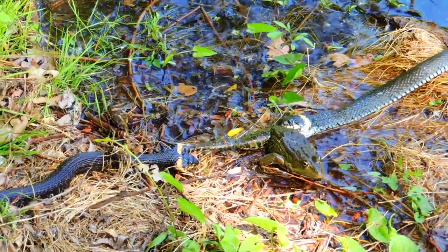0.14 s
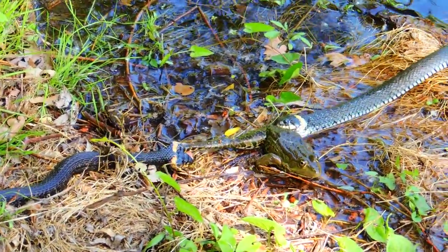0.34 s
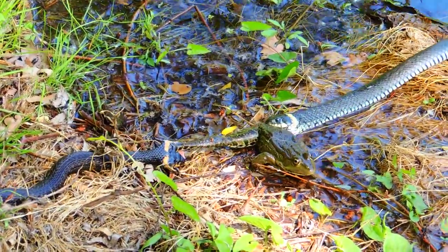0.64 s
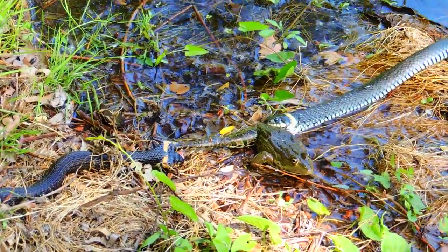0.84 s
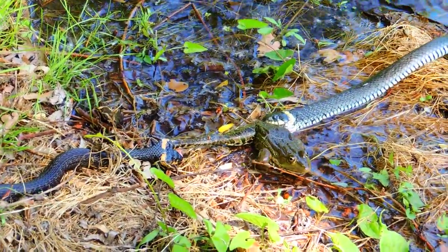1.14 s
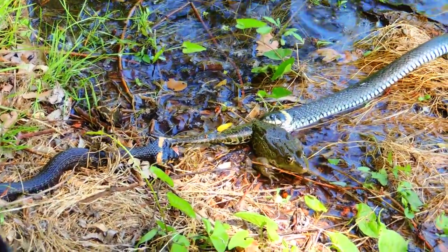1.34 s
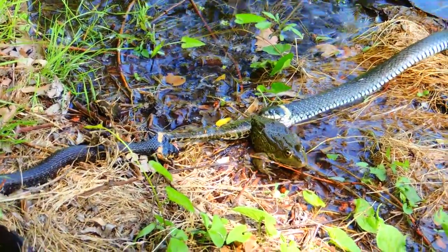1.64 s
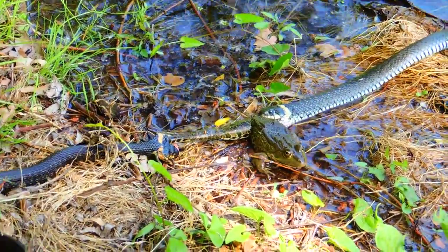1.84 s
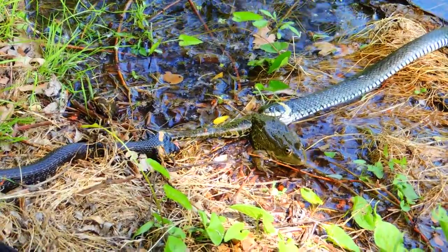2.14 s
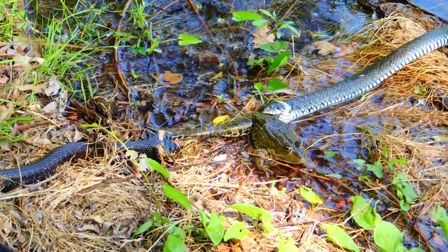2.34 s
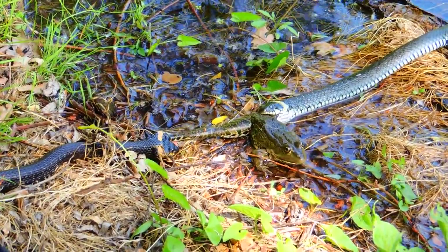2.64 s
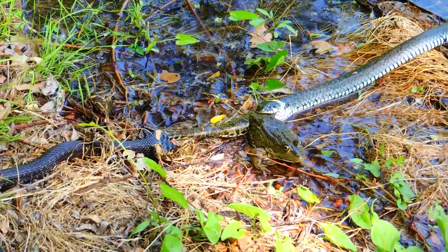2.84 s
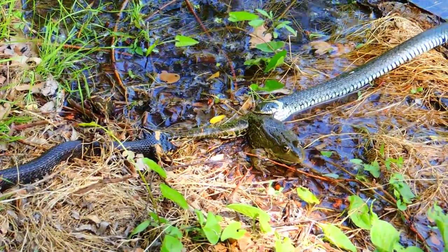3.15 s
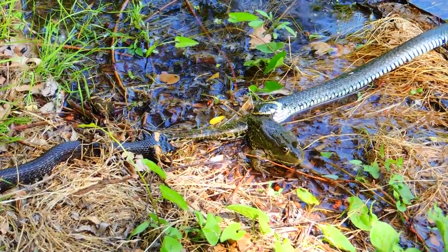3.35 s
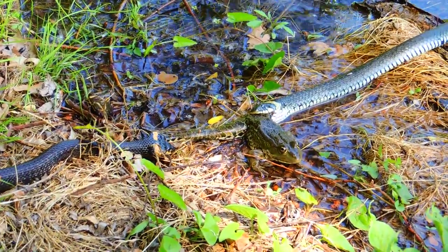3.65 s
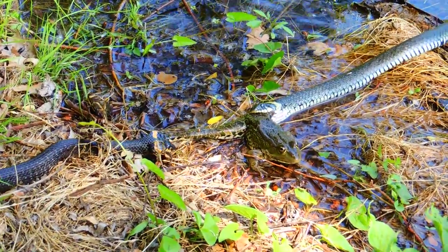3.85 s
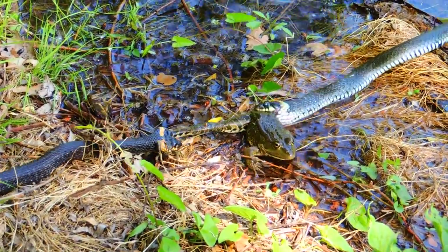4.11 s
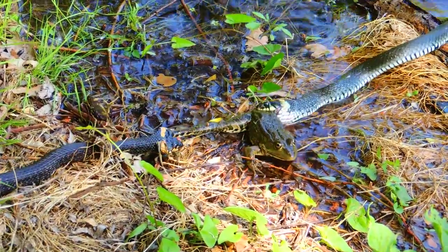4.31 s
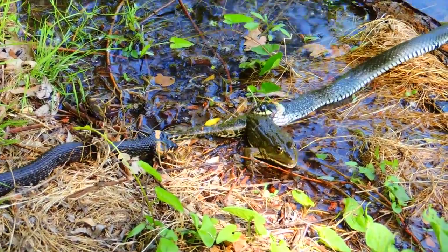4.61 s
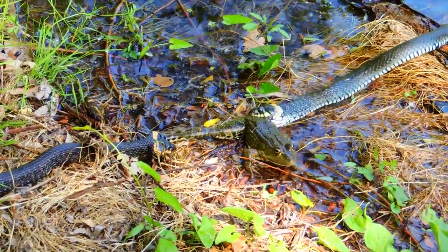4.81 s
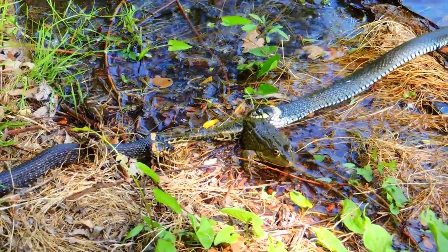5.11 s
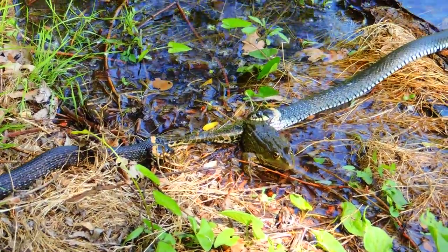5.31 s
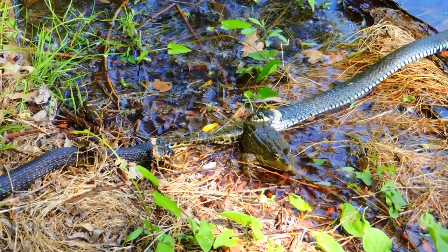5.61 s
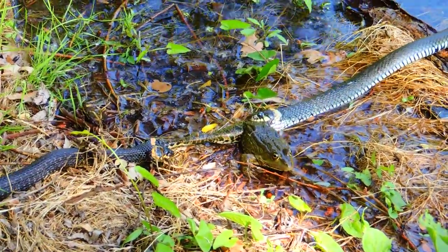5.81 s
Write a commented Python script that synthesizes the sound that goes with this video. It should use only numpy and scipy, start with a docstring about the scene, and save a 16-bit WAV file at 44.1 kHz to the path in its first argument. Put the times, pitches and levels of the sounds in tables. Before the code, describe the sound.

Outdoors at a wooded pond edge, a soft steady hush and blurred far bird chirps run throughout. Early puffs of wind rumble low on the microphone, dry stalks rustle and tiny ticks snap. A faint breathy frog grunt comes midway; late on, the frog screams once, close and sharp, for a third of a second, followed by a small pop, a weak grunt and a faint far whistle.

```python
"""A pond's edge in a wood: a steady hush of random spectra, with far birds as blurred gliding tones throughout.
Early on, puffs of low noise rumble on the microphone, dry litter rustles and short noise snaps tick.
Near 3 s a frog held by a snake grunts faintly, in ringing noise. Past 4.5 s it screams once, close by:
a swelling train of vocal pulses whose mouth resonance rises and falls, with hiss on every pulse.
Two single pulses and a last grunt follow, then a far low whistle."""
import sys
import numpy as np
from scipy import signal
from scipy.fft import rfft, irfft
from scipy.io import wavfile
from scipy.ndimage import uniform_filter1d

SR = 44100
rng = np.random.default_rng(int(sys.argv[2]) if len(sys.argv) > 2 else 0)


def int16_out(signal):
    """Quantize to a 16-bit WAV file."""
    q = np.round(np.clip(np.atleast_2d(signal).T, -1, 1) * 32767)
    wavfile.write(sys.argv[1], SR, q.astype(np.int16))


N = 263277  # length [samples]


def gain_of(db):
    """Decibels to an amplitude factor."""
    return 10 ** (np.asarray(db) / 20)


def evened(x):
    """Scales to rms 1."""
    return x / np.sqrt(np.mean(x ** 2) + 1e-20)


def read(points, at):
    """Joins the rows of a table by straight lines; one curve for each column after the first."""
    x, *columns = np.transpose(points)
    return [np.interp(at, x, c) for c in columns]


def swells(rows, at, rise_s, fall_s):
    """Bumps in dB that rise to their peak time and fall away."""
    return sum(db * np.exp(-((at - s) / np.where(at < s, rise_s, fall_s)) ** 2) for s, db in rows)


def sides(x, pan_db):
    """One sound to two channels; a positive pan is louder on the left."""
    return x * gain_of([[pan_db / 2], [-pan_db / 2]])


def add(mix, s, sound):
    """Mixes a two-channel sound in at time s."""
    part = mix[:, round(s * SR):][:, :sound.shape[1]]
    part += sound[:, :part.shape[1]]


def resonate(x, hz, width):
    """Shifts the curve hz down to zero, smooths, and shifts back: a resonance of gain 1."""
    turn = np.exp(2j * np.pi * np.cumsum(hz * np.ones(x.shape[-1])) / SR)
    r = np.exp(-np.pi * width / SR)
    return 2 * (turn * signal.lfilter([1 - r], [1, -r], x / turn)).real


# the hush of the wood, its spectrum: (frequency [Hz], relative level per Hz [dB])
HUSH_SPECTRUM = [(12, -28), (20, 0), (48, -7), (213, -8.5), (273, -12.5), (369, -10), (513, -14.5),
                 (714, -12), (1050, -15.5), (3070, -18), (4890, -21), (7190, -25), (14300, -26.5)]
HUSH_DB = -47.5  # rms of both channels together
# how alike the hush is at the two microphones: (frequency [Hz], left-right likeness [0 to 1])
LIKENESS = [(60, 0.85), (300, 0.54), (1000, 0.83), (3000, 0.05), (7000, 0.11), (14000, 0.03)]
LEFT_LAG_S = 6 / SR
# leaves stirring far off build up, then settle: (time [s], relative level [dB])
LEAVES = [(0.0, -1), (.3, .5), (1.54, 1.5), (1.75, 0.4), (2.8, -0.2), (5.97, -0.5)]
# dry stalks dragged over each other: (peak time [s], swell over the hush's treble [dB])
RUSTLE = [(1.4, 2), (1.63, 6), (1.78, 2.2), (2.12, 3), (3.03, 2.4), (4.4, 2)]
RUSTLE_RISE_S, RUSTLE_FALL_S = 0.13, 0.064  # swelling slowly, stopping sooner


def wood():
    """Random short-time spectra: a steady hush, whose middle and treble follow the leaves and the rustle."""
    frames, hz = N // 128 + 5, np.fft.rfftfreq(512, 1 / SR)
    a, b, c, d, patches = rng.standard_normal((frames, 257, 5)).T
    patches = evened(uniform_filter1d(uniform_filter1d(patches, 8, 0), 24, 1))
    flicker = evened(uniform_filter1d(rng.standard_normal(frames), 3))
    t, octave = np.arange(frames) * 128 / SR, np.log2(hz + 1)[:, None]

    leaves_db = read(LEAVES, t)[0]
    rustle_db = swells(RUSTLE, t, RUSTLE_RISE_S, RUSTLE_FALL_S)
    middle = np.exp(-(octave - np.log2(3200)) ** 2)
    treble = np.clip((octave - np.log2(5000)) / 0.3, 0, 1)
    level_db = middle * (leaves_db - leaves_db.mean())
    level_db = level_db + treble * (rustle_db - rustle_db.mean() + 0.51 * flicker)

    def on_log(table):
        """Reads a table of frequencies along octaves."""
        return read([(np.log2(f + 1), v) for f, v in table], octave)[0]

    same = np.clip(on_log(LIKENESS), 0, 1)
    right = a + 1j * b
    shared = same * right * np.exp(-2j * np.pi * hz[:, None] * LEFT_LAG_S)
    left = shared + np.sqrt(1 - same ** 2) * (c + 1j * d)
    spectra = np.array([left * gain_of(-0.5), right])
    spectra = spectra * gain_of(on_log(HUSH_SPECTRUM) + level_db + 0.6 * patches)
    hush = signal.istft(spectra, nperseg=512, noverlap=384)[1][:, :N]
    return gain_of(HUSH_DB) * evened(hush)


# puffs of a light wind on the microphone: (peak time [s], level over the breeze [dB])
PUFFS = [(0.03, 7.5), (.65, 8.6), (.98, 12), (1.27, 6.7)]
WIND_DB, PUFF_S = -61.5, 0.092  # rms of the breeze; rise and fall of a puff


def wind():
    """A soft rumble of low noise, partly shared by both microphone ports."""
    shared, *own = rng.standard_normal((3, N))
    low_band = signal.butter(2, [18, 60], "band", fs=SR, output="sos")
    rumble = signal.sosfilt(low_band, shared + 0.68 * np.array(own))
    return gain_of(WIND_DB + swells(PUFFS, np.arange(N) / SR, PUFF_S, PUFF_S)) * evened(rumble)


def scatter(x, t60):
    """Stems and trunks throw back sparse echoes that die away by 60 dB in t60 seconds."""
    taps = np.zeros((2, 12000))
    at = np.arange(300, 11980, 20) + rng.integers(0, 20, (2, 584))
    np.put_along_axis(taps, at, rng.choice([-1., 1.], at.shape), 1)
    taps *= gain_of(-60 * np.arange(12000) / SR / t60)
    return signal.oaconvolve(x, taps / np.linalg.norm(taps[0]), axes=1)[:, :N]


def note(hz, blur_hz, db, pan_db):
    """A gliding, fluttering whistle, blurred by the air and leaves it crossed."""
    noise = rng.standard_normal((4, 12000))[:, :len(hz)]
    blur = evened(resonate(resonate(noise[0] + noise[1:3], hz, blur_hz), hz, blur_hz))
    tone = blur + 0.43 * np.sin(2 * np.pi * np.cumsum(hz) / SR)  # a thin line inside the blur
    flutter = gain_of(1.7 * evened(uniform_filter1d(noise[3], 400)))
    fades = signal.windows.tukey(len(hz), .5)
    return sides(gain_of(db) * evened(tone * flutter) * fades, pan_db)


def glide(length_s, start, end):
    """A straight path from start to end, one value per sample."""
    return np.linspace(start, end, round(length_s * SR))


# one far bird repeats a high, wavering, falling call: (time [s], length [s], level before fades [dB])
SEEPS = [(0.489, 0.2, -60.5), (1.325, .08, -60), (2.977, 0.17, -54.5), (4.349, 0.16, -56.5),
         (5.362, 0.15, -62)]
SEEP_HZ, SEEP_FALL_HZ_PER_S, SEEP_BLUR_HZ = 7360, 3200, 350
SEEP_WAVER_HZ, SEEP_WAVERS_PER_S = 204, 24
# short slurred notes of other birds:
# (time [s], length [s], start frequency [Hz], end frequency [Hz], level before fades [dB])
CHIRPS = [(0.12, 0.12, 2970, 3220, -60.5), (0.808, 0.065, 5870, 5700, -62), (0.91, 0.053, 5900, 6160, -64),
          (1.202, 0.04, 4170, 4500, -58), (1.333, 0.078, 5040, 5250, -56), (1.48, 0.041, 4020, 4370, -58),
          (1.55, 0.052, 5920, 6050, -55), (1.677, .06, 5460, 5350, -59), (1.989, 0.062, 5700, 5700, -57),
          (2.137, .06, 5450, 5340, -61), (2.306, 0.067, 4840, 4380, -59), (2.377, 0.057, 5000, 5400, -61),
          (2.614, 0.044, 6100, 5420, -58.5), (2.888, .1, 6170, 6130, -62.5),
          (3.111, 0.093, 5560, 5880, -59), (3.189, 0.073, 5250, 4500, -57.5),
          (3.265, 0.075, 4520, 4780, -56), (3.395, 0.044, 4900, 5680, -54.5),
          (3.651, 0.066, 2570, 3430, -57), (4.365, 0.062, 4970, 5840, -58), (5.144, .08, 5570, 5400, -62)]
CHIRP_BLUR_HZ, BIRD_PAN_DB = 260, -2
# a low thin note to the right:
# (time [s], length [s], start frequency [Hz], end frequency [Hz], level before fades [dB])
WHISTLE = [(5.722, 0.2, 1780, 1760, -63.5)]
WHISTLE_BLUR_HZ, WHISTLE_PAN_DB = 30, -9
# fainter notes at random times: their number, level, pitch range, greatest slur and length
CHATTER_COUNT, CHATTER_DB, CHATTER_SLUR_HZ, CHATTER_S = 10, -67.5, 397, 0.071
CHATTER_HZ = (3180, 6030)  # (lowest frequency [Hz], highest frequency [Hz])


def birds():
    """Blurred gliding tones: the high caller, the chirps, one low whistle and faint chatter."""
    out = np.zeros((2, N))
    for s, length, db in SEEPS:
        t = glide(length, 0, length)
        waver = SEEP_WAVER_HZ * np.sin(2 * np.pi * (SEEP_WAVERS_PER_S * t + rng.random()))
        add(out, s, note(SEEP_HZ - SEEP_FALL_HZ_PER_S * t + waver, SEEP_BLUR_HZ, db, BIRD_PAN_DB))
    for s, length, start_hz, end_hz, db in CHIRPS:
        add(out, s, note(glide(length, start_hz, end_hz), CHIRP_BLUR_HZ, db, BIRD_PAN_DB))
    for s, length, start_hz, end_hz, db in WHISTLE:
        add(out, s, note(glide(length, start_hz, end_hz), WHISTLE_BLUR_HZ, db, WHISTLE_PAN_DB))
    for when, high, slur in rng.random((CHATTER_COUNT, 3)):
        hz = np.interp(high, (0, 1), CHATTER_HZ)
        path = glide(CHATTER_S, hz, hz + CHATTER_SLUR_HZ * (2 * slur - 1))
        add(out, when * N / SR, note(path, CHIRP_BLUR_HZ, CHATTER_DB, 0))
    return out


# ticks in the litter: (time [s], peak level before panning [dB], centre [Hz], left over right [dB])
TICKS = [(1.6194, -39, 4590, -2.5), (2.084, -38.5, 12100, -8), (2.0992, -41, 4910, -1.5),
         (2.137, -32.5, 11600, -8), (2.379, -40, 5570, -3), (4.6095, -32, 6200, 5), (4.9642, -40, 4380, 19),
         (5.1542, -43, 5200, -0.5)]


def ticks():
    """Short snaps of dying noise, each ringing broadly around one pitch."""
    out, t = np.zeros((2, N)), np.arange(300) / SR
    for s, db, hz, pan_db in TICKS:
        burst = rng.standard_normal(300) * gain_of(-60 * t / 0.01)
        snap = resonate(resonate(burst, hz, 4600), hz, 4600)
        add(out, s, sides(gain_of(db) * snap / abs(snap).max(), pan_db))
    return out


# faint breathy grunts in the frog's throat: (time [s], length [s], level at the middle [dB])
GRUNTS = [(2.922, 0.23, -47), (5.281, 0.1, -48.5)]


def grunts():
    """Breath noise swells and fades through two throat resonances."""
    t = np.arange(N) / SR
    breath = sum(gain_of(db) * np.sin(np.pi * np.clip((t - s) / length, 0, 1)) ** 2
                 for s, length, db in GRUNTS)
    return breath * evened(resonate(resonate(rng.standard_normal(N), 790, 230), 730, 330))


def mode(hz, centre_hz, width, db, pan_db):
    """Power of one resonance in each channel; it dies away steeply above its centre."""
    peak = gain_of(2 * db) / (1 + (2 * (hz - centre_hz) / width) ** 2)
    power = peak / (1 + (hz / (1.18 * centre_hz)) ** 18)
    return power * gain_of([pan_db, -pan_db])[:, None, None]


def struck(power):
    """The causal ring whose spectrum has this power: fold the cepstrum onto positive times."""
    cepstrum = irfft(np.log(power + 1e-12) / 2)
    half = cepstrum.shape[-1] // 2
    cepstrum[..., 1:half] *= 2
    cepstrum[..., half + 1:] = 0
    return np.exp(rfft(cepstrum))


# the scream: (time [s], effort [dB], mouth ring over the effort [dB], mouth frequency [Hz])
SCREAM = [(4.570, -41.5, -13, 2200), (4.605, -38.5, -17, 2200), (4.663, -31, -9, 2220),
          (4.679, -28.5, 9, 2450), (4.694, -31.5, 15.5, 2670), (4.715, -27.5, 12.5, 3040),
          (4.755, -25.5, 11.5, 2980), (4.782, -26.5, 14.5, 3175), (4.846, -22.5, 6.5, 2610),
          (4.865, -29.5, 4.5, 2350), (4.878, -30, -1.5, 2130), (4.886, -34, -16, 2160),
          (4.908, -42, -25, 2200)]
# the jaw ring grows with the mouth ring up to a knee, and drops again once the mouth gapes wide
JAW_DB, JAW_SLOPE, JAW_KNEE_DB = 13, 0.79, 2
GAPE_HZ, GAPE_SPAN_HZ, GAPE_DROP_DB = 2430, 300, 7
# turbulence grows as the mouth ring climbs in pitch, and once its level passes a knee
AIR_DB, AIR_FROM_HZ, AIR_DB_PER_KHZ, AIR_KNEE_DB, AIR_SLOPE = -17, 2230, 7, 8, 0.84


def gape(at):
    """Effort, jaw ring, mouth ring, mouth pitch and turbulence, as the mouth opens and shuts."""
    effort_db, mouth_db, mouth_hz = read(SCREAM, at)
    wide = np.clip((mouth_hz - GAPE_HZ) / GAPE_SPAN_HZ, 0, 1)
    jaw_db = JAW_DB + JAW_SLOPE * np.minimum(mouth_db - JAW_KNEE_DB, 0) - GAPE_DROP_DB * wide
    air_db = AIR_DB + AIR_DB_PER_KHZ * (mouth_hz - AIR_FROM_HZ) / 1000
    air_db = air_db + AIR_SLOPE * np.maximum(mouth_db - AIR_KNEE_DB, 0)
    return effort_db, jaw_db, mouth_db, mouth_hz, air_db


# the vocal cords during the scream: (time [s], pulse rate [per s])
PULSE_RATE = [(4.57, 96.0), (4.588, 210.1), (4.625, 229.5), (4.649, 281.4), (4.676, 256.8), (4.747, 278.0),
              (4.768, 269.6), (4.78, 250.7), (4.8, 255.8), (4.825, 245.5), (4.842, 217.7), (4.875, 109.6),
              (4.908, 110.8)]


def cords():
    """Where the cords sound, their running count of turns, and the time of each pulse."""
    t = np.arange(N) / SR
    sounding = (t > PULSE_RATE[0][0]) & (t < PULSE_RATE[-1][0])
    turns = np.cumsum(read(PULSE_RATE, t)[0] * sounding) / SR
    times = np.interp(np.arange(1, int(turns[-1]) + 1), turns[sounding], t[sounding])
    times += 12e-6 * rng.standard_normal(len(times))  # the cords never repeat exactly
    return sounding, turns, times


# throat resonances that stay put: (centre [Hz], width [Hz], relative level [dB], left over right [dB])
THROAT = [(787, 261, -0.5, -3.5), (1320, 570, -6.5, 5.5), (12100, 2100, -22.5, -10)]
# heard as the jaw drops: (centre [Hz], width [Hz], level over the jaw ring [dB], left over right [dB])
JAW = [(1780, 290, -7, 0.5), (3400, 650, -20.5, -3)]
# heard with the mouth ring: (centre [Hz], width [Hz], level over that ring [dB], left over right [dB])
CHEEKS = [(2470, 440, -13, -1), (5000, 630, -29, 0)]
MOUTH_WIDTH_HZ, MOUTH_PAN_DB = 435, -5
# single pulses after the scream: (time [s], approximate peak level [dB])
POPS = [(4.9481, -28), (4.970, -42)]


def pulses(times):
    """Each vocal pulse rings the throat and, as it opens, the jaw, mouth and cheeks."""
    hz, out = np.fft.rfftfreq(2048, 1 / SR), np.zeros((2, N))
    effort_db, jaw_db, mouth_db, mouth_hz, _ = (c[:, None] for c in gape(times))
    throat = sum(mode(hz, *m) for m in THROAT)
    jaw = gain_of(2 * jaw_db) * sum(mode(hz, *m) for m in JAW)
    mouth = mode(hz, mouth_hz, MOUTH_WIDTH_HZ, mouth_db, MOUTH_PAN_DB)
    mouth += gain_of(2 * mouth_db) * sum(mode(hz, *m) for m in CHEEKS)
    small = 1 / (1 + (590 / (hz + 1)) ** 12)  # a small body radiates no bass
    scale = -SR / (np.pi * THROAT[0][1])  # a throat ring peaks near its effort
    size = scale * gain_of(effort_db + .45 * rng.standard_normal(effort_db.shape))
    # places each pulse between samples
    late = np.exp(-2j * np.pi * hz * (times - np.round(times * SR) / SR + 8 / SR)[:, None])
    # the mouth ring takes a few cycles to build up: a delay around its pitch that leaves levels alone
    swing = mouth_hz ** 2 - hz ** 2 - 1j * 2000 * hz
    builds = swing / swing.conj()
    rings = irfft(struck(small * (throat + jaw + mouth)) * size * late * builds)
    for k, s in enumerate(times):
        add(out, s - 40 / SR, rings[:, k])
    for s, db in POPS:
        ring = irfft(struck(small * mode(hz[None], 706, 230, 0, 0)))[:, 0]
        add(out, s, scale * gain_of(db) * ring)
    return out


# hiss bands of the scream: (centre at the highest mouth pitch [Hz], width [Hz], relative level [dB],
# left over right [dB], shift per shift of the mouth ring [Hz/Hz])
TREBLE = [(6100, 5900, -2.5, -1, 0.077), (9150, 1040, -5, -15.5, 0.52), (12060, 1600, -7.5, -17, 0.14),
          (13600, 640, -7, -4, 0)]


def turbulence(sounding, turns):
    """Air hisses through the open mouth: a burst after each pulse over a steady flow."""
    out = np.zeros((2, N))
    effort_db, _, _, mouth_hz, air_db = gape(np.arange(N) / SR)
    burst = 0.38 + 1.3 * np.exp(-(turns % 1) / 0.34)
    noise = rng.standard_normal(N) + 1.93 * rng.standard_normal((2, N))  # partly shared by the channels
    air = sounding * burst * gain_of(effort_db + air_db) * noise
    for centre_hz, width, db, pan_db, follows in TREBLE:
        band_hz = centre_hz + follows * (mouth_hz - mouth_hz.max())
        hiss = resonate(resonate(air, band_hz, width), band_hz, width)
        hiss = hiss * np.sqrt(SR / width) / 4  # evens out the band widths
        out += sides(gain_of(db) * hiss, pan_db)
    return out


# bounce off the ground, one row a channel, left then right: (level [dB])
GROUND_DB = [
    [-6.5],
    [-12.5],
]
GROUND_S = 0.001246  # delay behind the direct sound


def frog():
    """Pulses and turbulence reach the microphone directly and off the ground; the grunts come direct."""
    sounding, turns, times = cords()
    scream = pulses(times) + turbulence(sounding, turns)
    scream += gain_of(GROUND_DB) * np.roll(scream, round(GROUND_S * SR), axis=1)
    return scream + grunts()


def scene():
    """The close frog and far birds with their echoes, over ticks, wind and the wood."""
    cry, song = frog(), birds()
    cry = cry + gain_of(-21) * scatter(cry, .3)
    song = song + gain_of(-2.5) * scatter(song, 0.44)
    return cry + song + ticks() + wind() + wood()


EDGE_HZ = 14150


def record(dry):
    """The band limit of the recorder: a steep low-pass."""
    low_pass = signal.firwin(1023, EDGE_HZ, window=("kaiser", 9), fs=SR)
    return signal.oaconvolve(dry, low_pass[None], "same")


dry = scene()
out = record(dry)
int16_out(out)
```